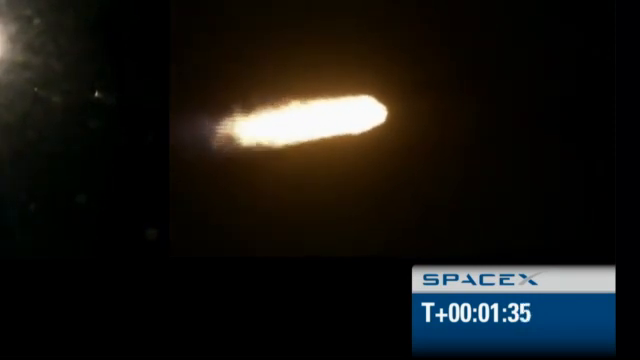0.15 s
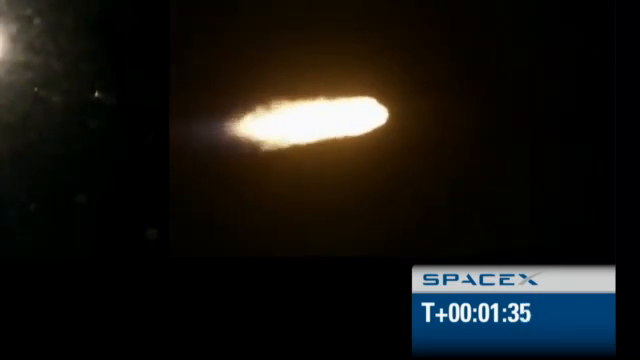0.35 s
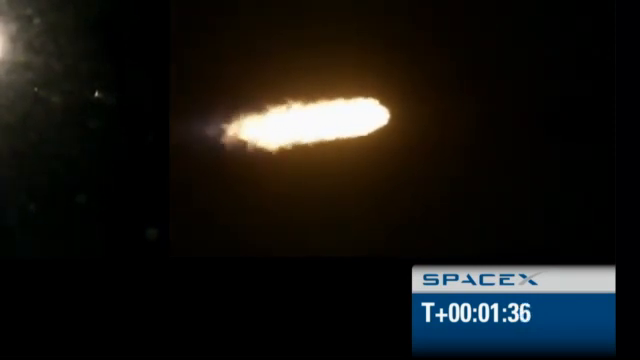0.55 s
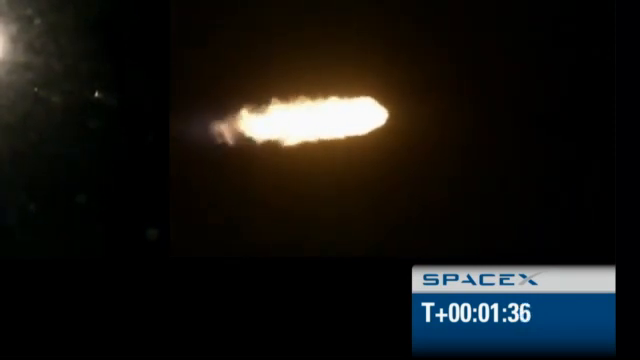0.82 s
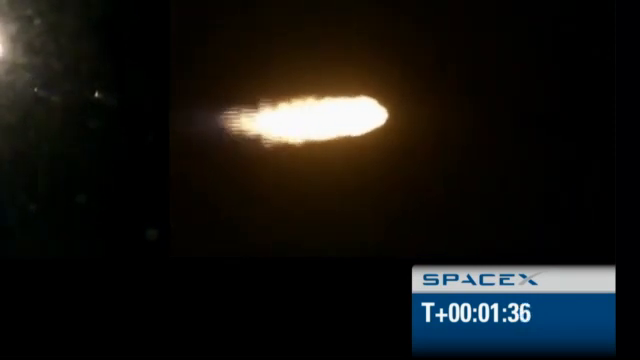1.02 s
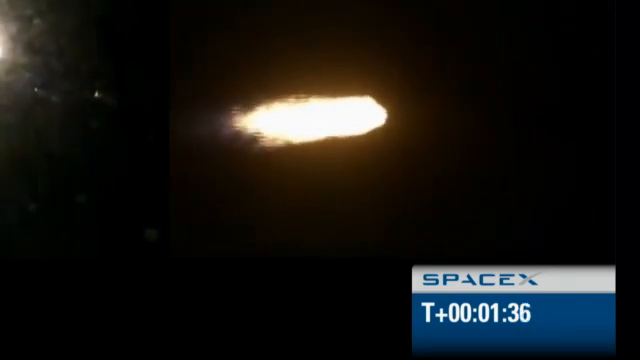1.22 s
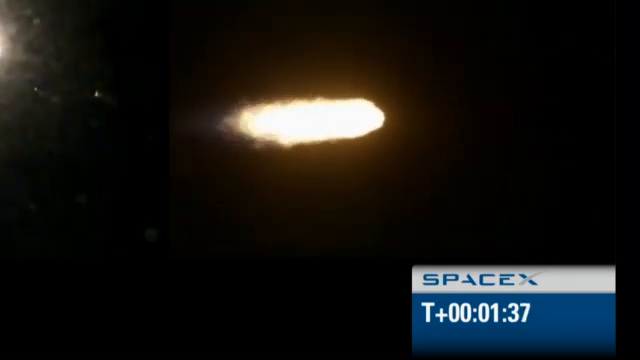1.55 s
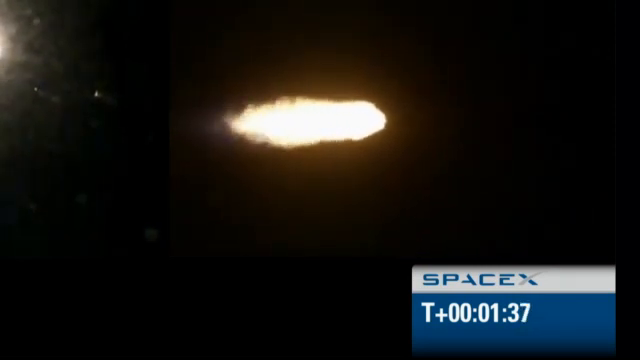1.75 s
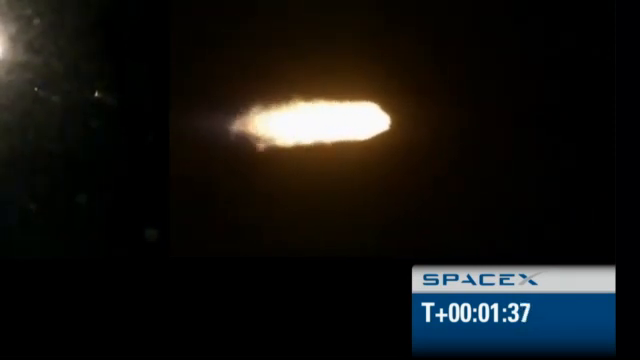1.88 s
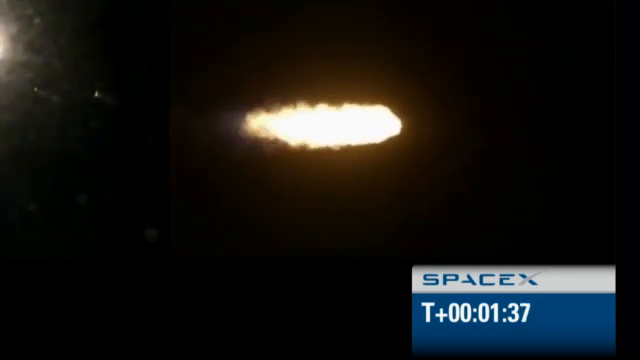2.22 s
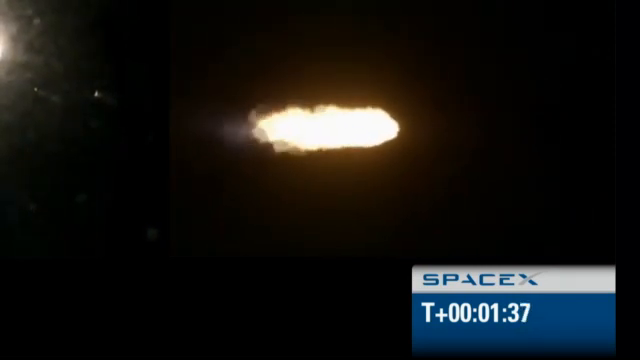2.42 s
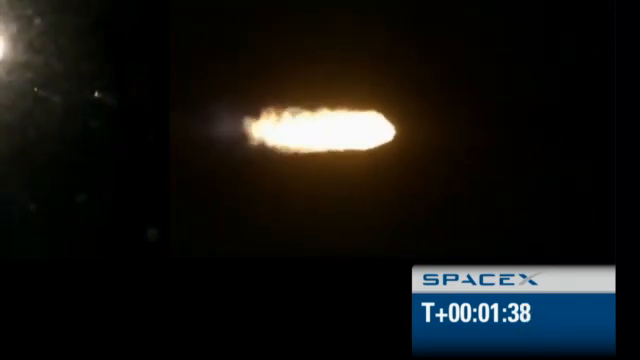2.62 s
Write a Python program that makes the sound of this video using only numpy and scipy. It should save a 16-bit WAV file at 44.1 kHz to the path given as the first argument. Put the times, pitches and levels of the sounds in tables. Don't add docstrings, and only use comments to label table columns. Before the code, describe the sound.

Far-off rocket thrust rumbling very low, with hard dry crackling snaps scattered unevenly over it

```python
import sys
import numpy as np
from scipy import signal
from scipy.fft import rfft, irfft, next_fast_len
from scipy.io import wavfile
from scipy.ndimage import uniform_filter1d

SR = 44100
rng = np.random.default_rng(int(sys.argv[2]) if len(sys.argv) > 2 else 0)


def to_linear_factor(level_db):
    exponent = np.asarray(level_db, float) / 20
    return 10 ** exponent


def generate_wav(signal):
    frames = np.transpose(np.atleast_2d(signal))
    scaled = np.clip(frames, -1, 1) * 32767
    pcm = np.round(scaled).astype(np.int16)
    wavfile.write(sys.argv[1], SR, pcm)


N = 121275

# start_s, rumble_db, roar_db
THRUST_CURVE = [(0.0, -13, -48), (0.11, -19.5, -38), (0.14, -12.5, -41.5), (0.59, -8.5, -37),
                (1.29, -10, -36), (1.51, -8.5, -42), (1.57, -19.5, -37.5), (1.6, -12.5, -34.5),
                (1.75, -19, -35.5), (1.78, -13.5, -37), (1.84, -22, -45), (1.87, -15.5, -41.5),
                (2.1, -16.5, -42.5), (2.14, -21, -43), (2.18, -19, -43), (2.47, -15.5, -43.5),
                (2.69, -17.5, -38), (2.75, -17.5, -40)]
# start_s, length_ms, step_size, crest_delay_ms, crest_size (full scale = 1)
FEED_DROPOUTS = [(0.08824, 0.93, 0.48, 20.9, 0.49), (0.33407, 3.33, 0.56, 24.7, 0.47),
                 (0.40282, 1.59, 0.58, 12.8, 0.55), (0.60228, 1.13, 0.58, 16.6, 0.43),
                 (0.74758, 0.32, 0.62, 17.9, 0.48), (0.91541, 3.51, 0.61, 15.1, 0.18),
                 (1.01865, 1.84, 0.6, 12.9, 0.49), (1.14552, 2.88, 0.59, 24.9, 0.41),
                 (1.1984, 5.28, 0.56, 13.3, 0.16), (1.28069, 5.17, 0.53, 14.0, 0.39),
                 (1.33584, 2.15, 0.55, 19.9, 0.52), (1.45547, 0.88, 0.55, 11.4, 0.42),
                 (1.59294, 1.41, 0.37, 15.8, 0.43), (2.16477, 1.77, 0.34, 23.2, 0.44),
                 (2.21645, 1.22, 0.34, 21.6, 0.33), (2.34783, 1.02, 0.33, 23.9, 0.39),
                 (2.39831, 1.09, 0.35, 23.7, 0.27)]
# start_s, signed_size, swell_delay_ms, signed_swell_size (full scale = 1)
FEED_TICKS = [(.49965, -.58, 18.1, -.6), (.86631, .78, 10.4, .76), (.89965, -.44, 12.0, -.67),
              (1.16629, .8, 7.1, .74), (1.59962, .5, 9.1, .43), (2.16645, -.14, 18, .2),
              (2.16659, -.2, 18, .2), (2.16668, .12, 18, .2), (2.16679, .16, 18, .2),
              (2.39950, .12, 4, -.2), (2.39961, .3, 4, -.2), (2.63291, .44, 18.0, .35)]


def colour(x, points):
    hz, db = np.array(points, float).T
    size = next_fast_len(len(x))
    f = np.maximum(np.arange(size // 2 + 1) * SR / size, 1)
    gain = to_linear_factor(np.interp(np.log(f), np.log(hz), db, left=-80))
    return irfft(rfft(x, size) * gain, size)[:len(x)]


def butter(x, order, hz, kind):
    return signal.sosfilt(signal.butter(order, hz, kind, fs=SR, output="sos"), x)


def unit(x):
    return x / np.sqrt(np.mean(x ** 2))


def bump(t, at, before, after):
    return np.exp(-.5 * ((t - at) / np.where(t < at, before, after)) ** 2)


def gate(t, at, length):
    return np.clip((t - at) * SR, 0, 1) - np.clip((t - at - length) * SR, 0, 1)


def decay(t, t60_s):
    return np.exp(-np.log(1000) * t / t60_s)


def free_rumble():
    # pitch_hz, level_db (per Hz)
    rumble_colour = [(12, -20), (22, 0), (34, -6.5), (58, -8), (85, -20), (140, -26.5), (210, -36.5),
                     (400, -50)]
    even_out, pointed = .55, .93
    wave = signal.hilbert(colour(rng.standard_normal(N), rumble_colour))
    peaks = np.arcsin(pointed * np.cos(np.angle(wave)))
    noise = unit(np.abs(wave) ** (1 - even_out) * peaks)
    return signal.sosfiltfilt(signal.butter(2, 300.0, fs=SR, output="sos"), noise)


def rumble(t):
    fall_s, trough_lead_s, recover_s, depth = 0.0024, 0.00066, 0.0073, 0.83
    crest_s, swell_rise_s, swell_fall_s = 0.0031, 0.0019, .008
    duck, busy_s = .93, .017
    start_s, rumble_db, _ = np.array(THRUST_CURVE).T
    shapes, busy = [np.zeros(N)], np.zeros(N)
    for at, ms, size, crest_ms, crest in FEED_DROPOUTS:
        trough = bump(t, at - trough_lead_s, fall_s, recover_s + ms / 2000)
        shapes.append(crest * bump(t, at + crest_ms / 1000, crest_s, 1.2 * crest_s))
        shapes.append(-depth * size * trough)
        busy = np.maximum(busy, bump(t, at + crest_ms / 2000, busy_s, busy_s))
    for at, _, swell_ms, swell in FEED_TICKS:
        peak_s = at + swell_ms / 1000
        shapes.append(swell * bump(t, peak_s, swell_rise_s, swell_fall_s))
        busy = np.maximum(busy, bump(t, peak_s, 0.011, 0.012))
    free = free_rumble() * to_linear_factor(np.interp(t, start_s, rumble_db) + 0.76) * (1 - duck * busy)
    return free + np.max(shapes, axis=0) + np.min(shapes, axis=0)


def roar(t):
    # pitch_hz, level_db (per Hz)
    roar_colour = [(120, 11.5), (250, -1), (500, -8.5), (730, -13.5), (950, -12.5), (1400, -24.5),
                   (2500, -41.5), (5000, -67)]
    start_s, _, roar_db = np.array(THRUST_CURVE).T
    bands = np.zeros(N)
    for hz in 100 * 2. ** np.arange(7):
        bands += butter(rng.standard_normal(N), 2, [hz, 2 * hz], "bandpass")
    return unit(colour(bands, roar_colour)) * to_linear_factor(np.interp(t, start_s, roar_db) + 1.4)


def line_hiss():
    hiss = colour(rng.standard_normal(N), [(1500, 13), (4000, 5), (9000, 2), (11000, -3.5)])
    return to_linear_factor(-56.5) * unit(hiss)


def crackle(t, low):
    tick_s, tick_db = 1 / SR, 5.6
    steps, ticks = np.zeros(N), np.zeros(N)
    for at, ms, size, _, _ in FEED_DROPOUTS:
        held = size + low[int(at * SR)] - low
        steps += gate(t, at, ms / 1000) * held
    for at, size, _, _ in FEED_TICKS:
        ticks += size * gate(t, at - tick_s / 2, tick_s)
    return steps + to_linear_factor(tick_db) * ticks


def speaker_cone(woofer_t, tweeter_t):
    # pitch_hz, level_db, t60_ms, polarity
    speaker_modes = [(366, -17.9, 3.0, -1), (954, -8.2, 3.5, 1), (1065, -10.9, 5.6, -1),
                     (1574, -27.0, 20.1, -1), (2204, -34.6, 9.4, 1), (2646, -42.5, 16.1, -1),
                     (3216, -34.6, 6.9, -1), (3707, -33.0, 6.7, -1), (4303, -26.1, 3.0, -1),
                     (5812, -39.8, 19.4, 1), (7449, -27.0, 10.5, -1), (8667, -25.5, 4.0, 1),
                     (8938, -39.1, 22.2, 1), (10335, -34.1, 8.7, 1)]
    crossover_hz, tweeter_db = 2300, 3
    box_hz, box_db, box_t60_s = 437.3, -41.5, 0.045
    cone = np.zeros(len(woofer_t))
    for hz, db, ms, polarity in speaker_modes:
        late = woofer_t if hz < crossover_hz else tweeter_t
        level = to_linear_factor(db + tweeter_db * (hz > crossover_hz))
        cone += polarity * level * np.sin(2 * np.pi * hz * late) * decay(late, ms / 1000)
    cone = butter(cone, 1, 230.0, "highpass")
    box = np.sin(2 * np.pi * box_hz * woofer_t) * decay(woofer_t, box_t60_s)
    return cone + to_linear_factor(box_db) * box


def wall_echoes(cone):
    # delay_ms (after the loudspeaker), level_db
    wall_bounces = [
        (11.5, -13.5),
        (23.1, -21),
        (33.6, -34),
    ]
    bright = butter(cone, 2, 5560, "highpass")
    return sum(to_linear_factor(db) * np.roll(bright, int(ms / 1000 * SR)) for ms, db in wall_bounces)


def near_scatter(late):
    near_colour = [(300, -2), (1200, -4.5), (4000, -7.5), (6500, -18), (9500, 3.5)]
    near = unit(colour(rng.standard_normal(len(late)), near_colour))
    return to_linear_factor(-23.5) * (late > 0) * near * decay(late, 0.025)


def room_tail(t, late):
    # pitch_hz, level_db (per Hz)
    room_colour = [(200, 1.5), (450, -10), (900, 3), (1600, -5), (2600, -4), (6000, -6.5), (8800, 9.5),
                   (11000, -5.5)]
    rise_s, t60_s = .01, .3
    tail = unit(colour(rng.standard_normal(len(t)), room_colour))
    return to_linear_factor(-38) * tail * (1 - np.exp(-late / rise_s)) * decay(t, t60_s)


def loudspeaker():
    woofer_lag_s, tweeter_lag_s = .004537, .004768
    t = np.arange(SR // 2) / SR
    woofer_t = np.maximum(t - woofer_lag_s, 0)
    tweeter_t = np.maximum(t - tweeter_lag_s, 0)
    cone = speaker_cone(woofer_t, tweeter_t)
    return to_linear_factor(0.55) * (cone + wall_echoes(cone) + near_scatter(woofer_t) + room_tail(t, woofer_t))


def scene():
    t = np.arange(N) / SR
    low = rumble(t)
    clicks = crackle(t, low)
    answer = signal.fftconvolve(clicks, loudspeaker())[:N]
    mid = low + roar(t) + line_hiss() + clicks + answer
    side_colour = [(30, -4.5), (300, -11.5), (600, -10.5), (1200, -24.5), (10000, -19)]
    side = to_linear_factor(-28.5) * colour(mid, side_colour)
    return np.array([mid - side, mid + side])


def dip_treble(dry):
    # start_s, length_ms, top_hz
    treble_dips = [
        (0.319, 6.4, 10500),
        (.347, 5.3, 7000),
        (0.511, 15, 7000),
        (.878, 11, 7000),
        (1.158, 3.5, 7500),
        (1.212, 9.8, 8000),
        (1.264, 10.5, 10500),
        (2.177, 18, 7000),
        (2.228, 15, 7000),
        (2.335, 5.8, 10500),
    ]
    bottom_hz, loss_db = 2300, -16
    t, link = np.arange(N) / SR, dry
    for at, ms, top_hz in treble_dips:
        sos = signal.butter(2, [bottom_hz, top_hz], "bandpass", fs=SR, output="sos")
        band = signal.sosfiltfilt(sos, dry)
        fade = uniform_filter1d(gate(t, at, ms / 1000), size=90)
        link = link - (1 - to_linear_factor(loss_db)) * fade * band
    return link


def top_cut(x):
    return signal.sosfilt(signal.butter(12, 11420, fs=SR, output="sos"), x)


def record(dry):
    link = dip_treble(dry)
    mix = signal.sosfiltfilt(signal.ellip(5, .3, 24, 10750, fs=SR, output="sos"), link)
    return top_cut(mix)


dry = scene()
out = record(dry)
generate_wav(out)
```